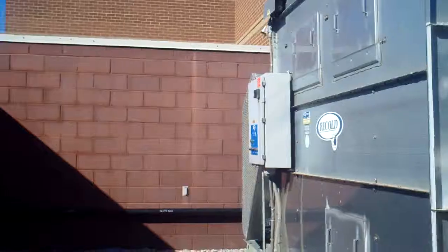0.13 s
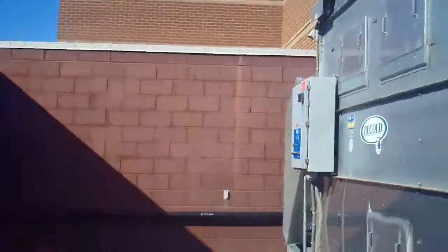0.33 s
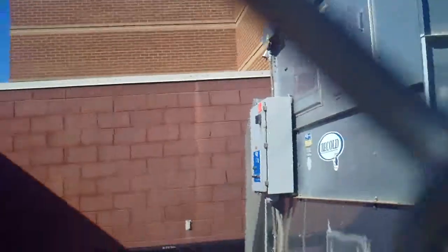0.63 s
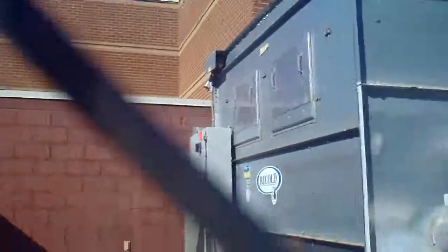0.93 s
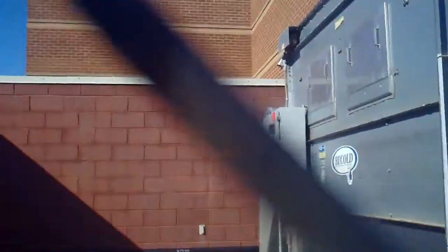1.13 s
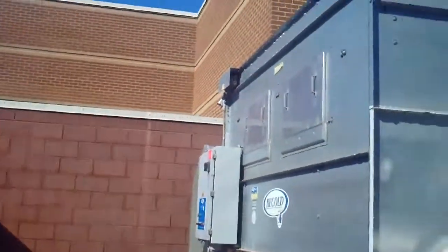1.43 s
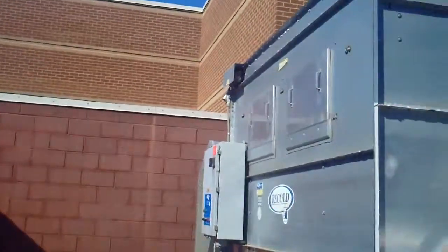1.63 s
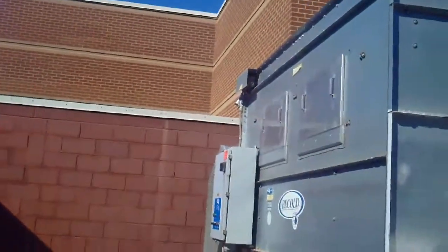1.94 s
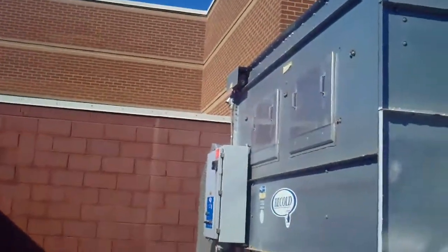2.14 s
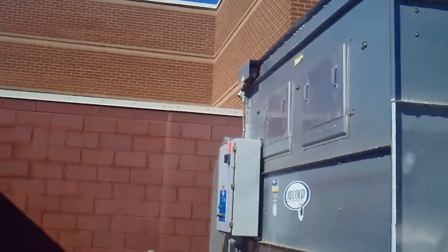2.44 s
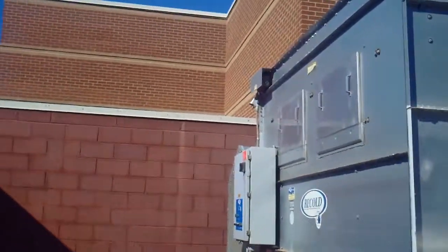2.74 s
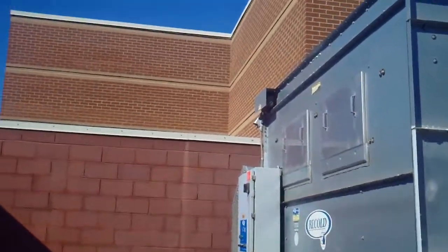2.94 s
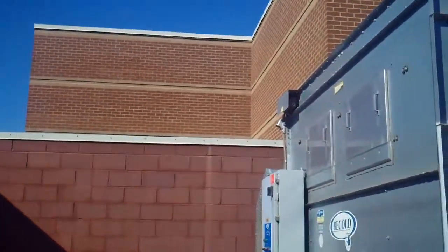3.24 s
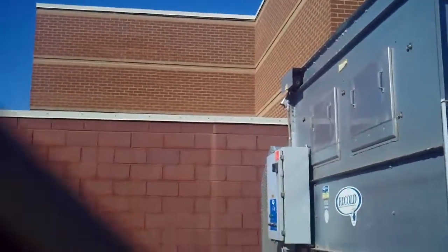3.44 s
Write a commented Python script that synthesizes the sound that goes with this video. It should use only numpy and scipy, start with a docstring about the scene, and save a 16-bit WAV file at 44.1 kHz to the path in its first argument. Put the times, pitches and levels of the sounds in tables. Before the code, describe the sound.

A cooling tower's big fan rushes and hums in a walled yard, with an even hiss of water spray. The hand-held microphone opens with a loud pop and gritty finger knocks, then picks up light rubs and occasional clicks.

```python
"""A cooling tower runs in a walled yard: its big fan rushes and hums, and water spray hisses inside.
A hand-held camera switches on with a pop that overloads its input. Fingers settle on the plastic
case with a run of gritty knocks, then rub it, shift their grip with soft thuds and now and then
make a seam click, which sets the case ringing."""
import sys
import numpy as np
from scipy import signal
from scipy.fft import rfft, irfft
from scipy.io import wavfile

SR = 44100
rng = np.random.default_rng(int(sys.argv[2]) if len(sys.argv) > 2 else 0)


def store_pcm(level_fs):
    """Save levels as 16-bit WAV."""
    pcm = np.round(np.clip(level_fs, -1, 1) * 32767).astype(np.int16)
    wavfile.write(sys.argv[1], SR, np.atleast_2d(pcm).T)


N = 158760
T = np.arange(N) / SR
CUTOFF_HZ = 15900   # top of the camera's range


def from_db(db):
    """Decibels to gain."""
    return 10 ** (np.asarray(db) / 20)


def rms_one(x):
    """Scale to unit rms."""
    return x / np.sqrt(np.mean(x ** 2) + 1e-20)


def noise(spectrum):
    """Unit-rms noise coloured by (frequency [Hz], level [dB]) points, rolling off above the last."""
    hz, db = np.transpose(spectrum)
    f = np.maximum(np.fft.rfftfreq(N, 1 / SR), 1)
    colour = from_db(np.interp(np.log(f), np.log(hz), db))
    rolloff = np.minimum(1, hz[-1] / f) ** 2
    return rms_one(irfft(rfft(rng.standard_normal(N)) * colour * rolloff, N))


def drift(rate_hz):
    """Smooth random motion, mostly slower than rate_hz; unit rms."""
    f = np.fft.rfftfreq(N, 1 / SR)
    return rms_one(irfft(rfft(rng.standard_normal(N)) * (f > 0) / (1 + (f / rate_hz) ** 2), N))


def cut(x, hz, kind, order=2):
    """Butterworth high- or low-pass."""
    return signal.sosfilt(signal.butter(order, hz, kind, fs=SR, output="sos"), x)


def bell(hz, centre_hz, width_oct):
    """A bell-shaped EQ curve of height 1."""
    return np.exp(-(np.log2(hz / centre_hz) / width_oct) ** 2)


def ring(t, hz, t60):
    """A dying tone of height 1."""
    return np.cos(2 * np.pi * hz * t) * np.exp(-np.log(1000) * t / t60)


def add(out, start_s, x):
    """Mix a short sound in at a given time."""
    i = int(start_s * SR)
    out[i:i + len(x)] += x[:N - i]


def swell(middle_s, half_s, db):
    """A bell-shaped fade in and out, peaking at db."""
    return from_db(db) * np.exp(-((T - middle_s) / half_s) ** 2)


def fan():
    """Air rushes through the fan with a slight flutter, over the wavering hum of the machine."""
    # colour of the rushing air: (frequency [Hz], relative level [dB])
    air_colour = [(15, -4), (30, -3), (100, -5.5), (160, 0), (260, -1.5), (400, -5.5), (500, -6), (740, -3),
                  (1000, -6), (1230, -10.5), (1380, -17.5), (2500, -26.5)]
    # hum of fan, motor and casing: (frequency [Hz], rms level [dB], waver share [0-1])
    hum_tones = [(21.5, -53.5, 0.26), (78.4, -50.5, 0.49), (114.6, -59.5, 0.7), (156, -56, 0.9),
                 (172.2, -45.5, 0.33), (205.8, -58, 0.6), (236.6, -55, 0.98), (250.2, -54.5, 0.86),
                 (357, -49, 0.3), (387.2, -55, 0.74), (415, -57, 0.66), (607, -56.5, 0.49),
                 (714, -54.5, 0.25), (930, -58, 0.35), (1090, -66, .35), (14450, -78, .6)]
    air_db, flutter_db, waver_hz = -38.5, .4, 3.4
    out = from_db(air_db + flutter_db * drift(rate_hz=22)) * noise(air_colour)
    for hz, db, waver in hum_tones:
        steady = np.sqrt(2 * (1 - waver ** 2))
        wander = waver * (drift(waver_hz) + 1j * drift(waver_hz))   # moves both level and phase
        tone = np.exp(2j * np.pi * (hz * T + rng.random()))
        out += from_db(db) * np.real((steady + wander) * tone)
    return out


def spray():
    """Countless falling drops merge into an even hiss with a faint flicker."""
    # colour of the falling water: (frequency [Hz], relative level [dB])
    water_colour = [(600, -2.5), (1400, -2.5), (2000, 0.5), (3350, -1.5), (3600, -5), (4250, -5.5),
                    (4750, -3.5), (5400, -9.5), (5850, -13), (6250, -7.5), (7400, -13), (8500, -12.5),
                    (9500, -8.5), (10600, -8.5), (12400, -16.5), (13800, -22), (15700, -28)]
    hiss_db, flicker_db = -41, .4
    return from_db(hiss_db + flicker_db * drift(rate_hz=31)) * noise(water_colour)


def switch_on_pop():
    """One-sided surges hit the input and drain away; it swings back and slowly recovers."""
    # electrical surges at switch-on: (time [s], height [full scale = 1], rise [s])
    surges = [(0.0732, 1.66, 0.000028), (0.0774, 0.62, 0.00035), (0.081, 0.71, 0.00066)]
    decay_s, end_s, fall_s = .0042, .0825, .0031
    sag_depth, recovery_s = .13, .084
    surge = sum(height * np.clip((T - start_s) / rise_s, 0, 1) * np.exp(-np.abs(T - start_s) / decay_s)
                for start_s, height, rise_s in surges)
    since_end = np.maximum(T - end_s, 0)
    held = np.exp(-since_end / fall_s)
    sag = sag_depth * (1 - held) * np.exp(-since_end / recovery_s)
    return surge * held - sag


def finger_knocks():
    """Each knock is a gritty crack and a brief ring of the touched panel; softer contacts are duller."""
    # fingers landing on the case:
    # (time [s], level [dB], decay [s], panel pitch [Hz], ring against grit [dB], top of the grit [Hz])
    knocks = [(0.0931, -14, 0.0019, 1290, -8, 5360), (0.1025, -10, 0.00095, 1000, -11, 7900),
              (0.107, -16, 0.0015, 1500, -7, 11100), (0.1084, -17, 0.003, 900, -1, 4940),
              (0.1143, -19, 0.00096, 1420, 5, 9000), (0.1217, -16, 0.00079, 685, 11.5, 1200),
              (0.1351, -4.5, 0.0015, 490, -7, 7200), (0.1377, -16.5, 0.0051, 1160, 1.5, 6800),
              (0.1475, -8, 0.00047, 1290, -6, 9200), (0.1576, -16, 0.0024, 880, -3, 5260),
              (0.1656, -10.5, 0.0015, 1130, 0.5, 5800), (0.1727, -16.5, .0022, 724, 1.5, 5760),
              (0.2655, -16, 0.0015, 467, -2.5, 7160), (0.3326, -29, 0.0027, 1190, 0, 4500),
              (0.3492, -12, 0.002, 1650, -4, 6300), (.3522, -11.5, .003, 870, -4.5, 4700),
              (0.3526, -7, 0.0015, 1480, -12, 12700), (.353, -37.5, 0.014, 434, 12.5, 900),
              (.353, -41, 0.027, 164, 12.5, 350), (.4352, -37, 0.0075, 720, 11.5, 1490),
              (.4370, -20.5, 0.0039, 1410, 4, 2920), (0.437, -14, 0.0013, 2650, 8, 5930),
              (0.5154, -29, 0.0014, 3980, -10, 7900), (.982, -33, .002, 3000, -8, 4500),
              (1.194, -29, 0.0017, 1690, -1, 6340), (1.3595, -24.5, 0.0013, 900, 4.5, 3460),
              (2.440, -37.5, 0.0053, 2000, 6.5, 6000), (3.0218, -26, 0.001, 3550, 1, 5470)]
    attack_s, tail_db, tail_s = .00022, -26.5, .004
    leak_db = -28   # a little bright grit gets past the low-pass
    out, t = np.zeros(N), T[:SR // 10]
    attack = 1 - np.exp(-t / attack_s)
    tail = from_db(tail_db) * np.exp(-t / tail_s)
    for start_s, db, decay_s, panel_hz, ring_db, top_hz in knocks:
        bright = cut(rng.choice([-1., 1.], len(t)), panel_hz, "high")
        grit = rms_one(cut(bright, top_hz, "low", order=6) + from_db(leak_db) * bright)
        panel = from_db(ring_db) * np.sin(2 * np.pi * panel_hz * t)
        envelope = attack * (np.exp(-t / decay_s) + tail)
        add(out, start_s, from_db(db) * envelope * (grit + panel))
    return out


def seam_clicks():
    """A seam snaps with a puff of bright grit and sets the case's modes ringing, each a moment apart."""
    # snaps of the seam: (time [s], level [dB], favoured pitch [Hz], hollow ring [dB], wall ring [dB])
    snaps = [(.1352, 0, 6700, 5, 1), (0.239, -17.5, 11000, -10, 0), (0.6607, -3.5, 6460, -13, 4.5),
             (1.6946, -1, 4800, -2, -0.5), (1.7053, -5, 7340, 5.5, 2.5), (2.9173, -15, 9900, 1, 5),
             (3.0277, -4.5, 6860, 4, -3)]
    # modes of the plastic case: (frequency [Hz], relative level [dB], t60 [s])
    case_modes = [(862, -21.5, 0.035), (1290, -23.5, 0.016), (2070, -28, 0.025), (3060, -28, 0.026),
                  (3710, -15, 0.01), (4250, -12, 0.0056), (4860, -16.5, 0.0071), (6730, -10, 0.005),
                  (7650, -15, 0.0038), (9840, -13.5, 0.0039), (10400, -20, 0.0063), (11400, -18, 0.0041),
                  (13700, -31, .004)]
    attack_s, max_lag_s = .00004, .00034
    grit_db, grit_decay_s = -11.5, .0014
    hollow_below_hz, wall_below_hz = 2500, 5800
    contact_boost_db = 7.5   # the place of contact favours some modes
    out, t = np.zeros(N), T[:SR // 10]
    attack = 1 - np.exp(-t / attack_s)
    for start_s, db, favoured_hz, hollow_db, wall_db in snaps:
        puff = rng.choice([-1., 1.], len(t)) * attack * np.exp(-t / grit_decay_s)
        grit = cut(cut(puff, 1490, "high"), 12500, "low", order=4)
        add(out, start_s, from_db(db + grit_db) * grit)
        for hz, mode_db, t60 in case_modes:
            contact_db = contact_boost_db * bell(hz, favoured_hz, width_oct=.14)
            body_db = hollow_db if hz < hollow_below_hz else wall_db if hz < wall_below_hz else 0
            gain = from_db(db + mode_db + contact_db + body_db)
            add(out, start_s + max_lag_s * rng.random(), gain * attack * ring(t, hz, t60))
    return out


def grip_thuds():
    """The hand shifts its grip: short, dull bumps of low noise."""
    # bumps of the hand: (middle [s], half length [s], level [dB])
    thuds = [(.136, 0.0033, -32), (.354, 0.0031, -20), (.98, 0.02, -35.5)]
    # colour of a thud: (frequency [Hz], relative level [dB])
    thud_colour = [(20, -17), (50, 14), (90, -3), (170, 6), (350, -11), (600, -28), (2000, -62)]
    return sum(swell(*thud) for thud in thuds) * noise(thud_colour)


def finger_rubs():
    """Skin slides on plastic with a grainy hiss, each stroke with a rasp of its own."""
    # strokes along the case: (middle [s], half length [s], level [dB], rasp pitch [Hz])
    strokes = [(0.27, 0.013, -33, 4500), (.289, .014, -34, 6700), (.32, 0.033, -44, 6600),
               (0.405, 0.058, -43.5, 4800), (.56, 0.25, -48.5, 4300), (0.821, 0.01, -34.5, 9500),
               (0.838, 0.0075, -34, 6300), (1.14, 0.0051, -33.5, 6000), (1.15, .003, -33.5, 5650),
               (1.174, 0.008, -41, 5800), (1.292, 0.024, -45, 6300), (1.37, .012, -50, 4000)]
    # colour of skin on plastic: (frequency [Hz], relative level [dB])
    skin_colour = [(600, 2.5), (2000, -2), (4000, 4.5), (6300, 0), (8000, -6), (10500, -2), (13000, -9),
                   (16000, -23)]
    grain_db, rasp_db = 2, 7.5
    hz = np.geomspace(500, CUTOFF_HZ, 100)
    skin_hz, skin_db = np.transpose(skin_colour)
    base_db = np.interp(np.log(hz), np.log(skin_hz), skin_db)
    grain = rms_one(from_db(grain_db * drift(rate_hz=300)))
    out = np.zeros(N)
    for middle_s, half_s, db, rasp_hz in strokes:
        colour_db = base_db + rasp_db * bell(hz, rasp_hz, width_oct=.24)
        out += swell(middle_s, half_s, db) * grain * noise(np.column_stack([hz, colour_db]))
    return out


def scene():
    """The tower's steady bed under the sounds of the hand on the camera, in mono."""
    return (fan() + spray() + finger_knocks() + seam_clicks() + grip_thuds() + finger_rubs())[None]


def record(dry):
    """The camera's input opens with a pop, clips at full scale and loses its top end."""
    switch_on_s = .073
    live = np.clip(dry * (T >= switch_on_s) + switch_on_pop(), -1, 1)
    steep_lowpass = signal.ellip(12, .1, 100, CUTOFF_HZ, fs=SR, output="sos")
    return signal.sosfilt(steep_lowpass, live)


dry = scene()
out = record(dry)
store_pcm(out)
```